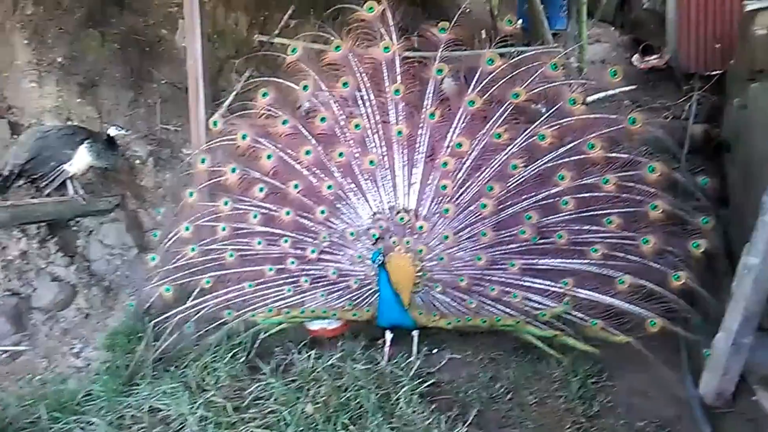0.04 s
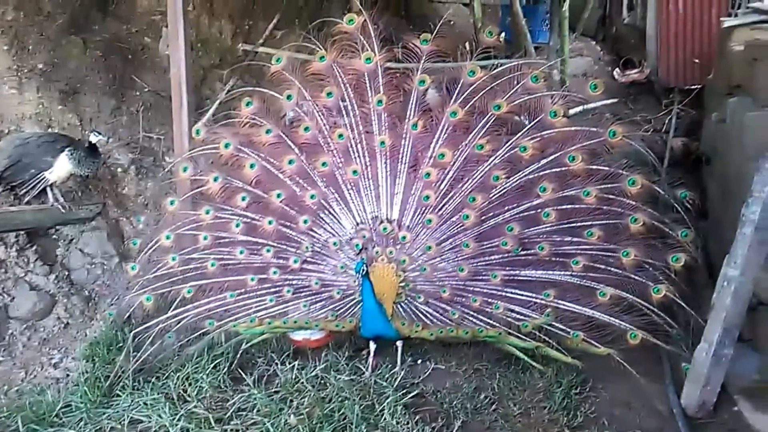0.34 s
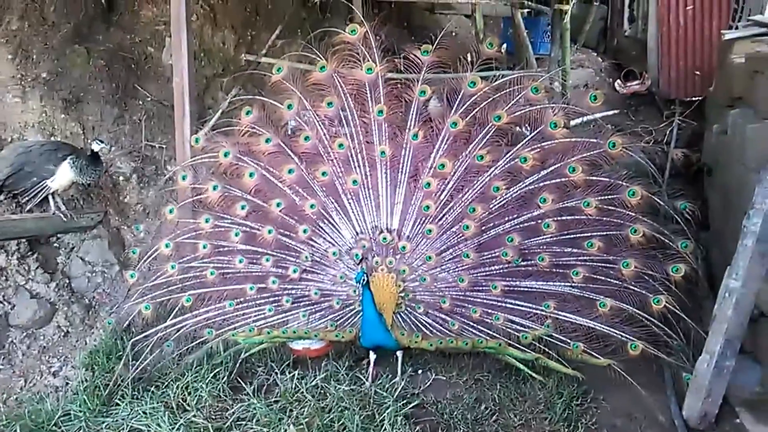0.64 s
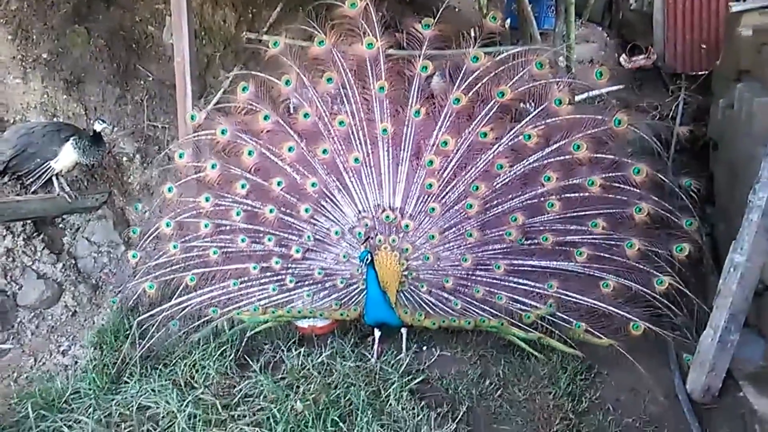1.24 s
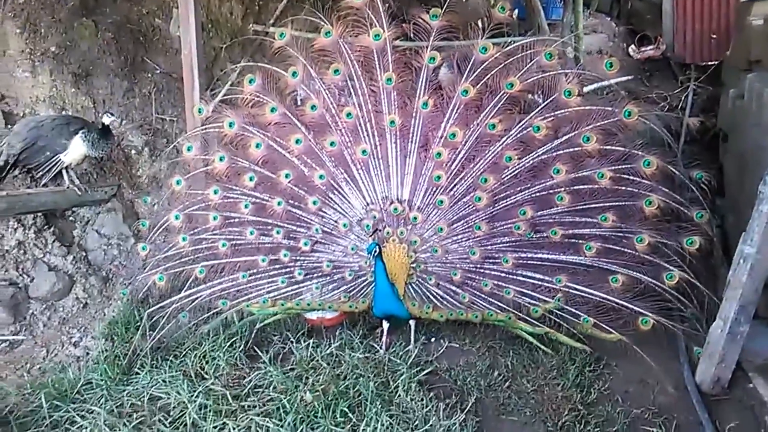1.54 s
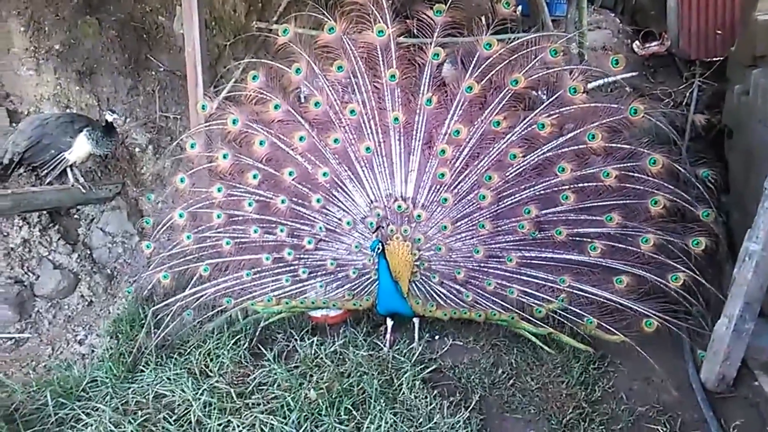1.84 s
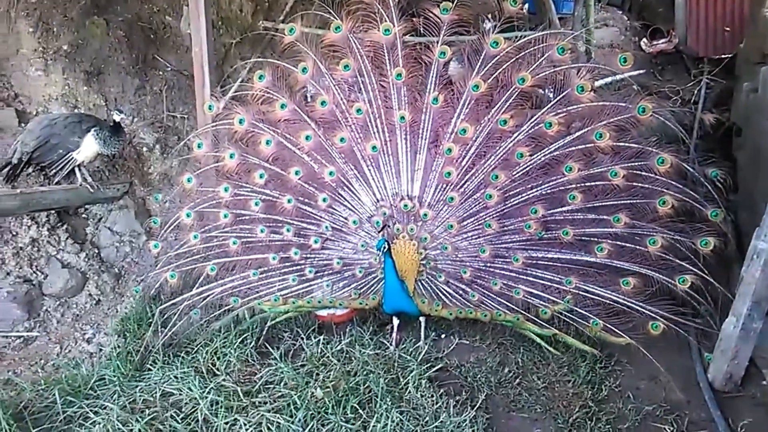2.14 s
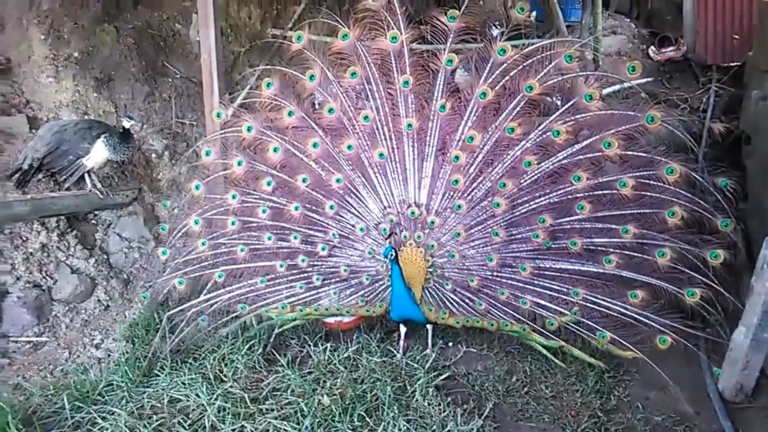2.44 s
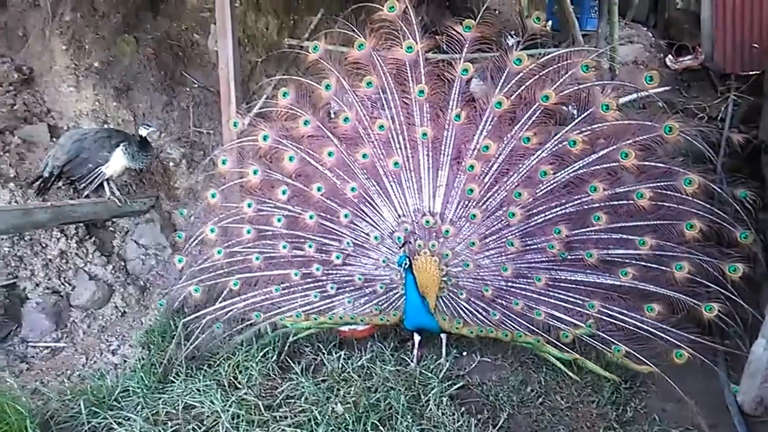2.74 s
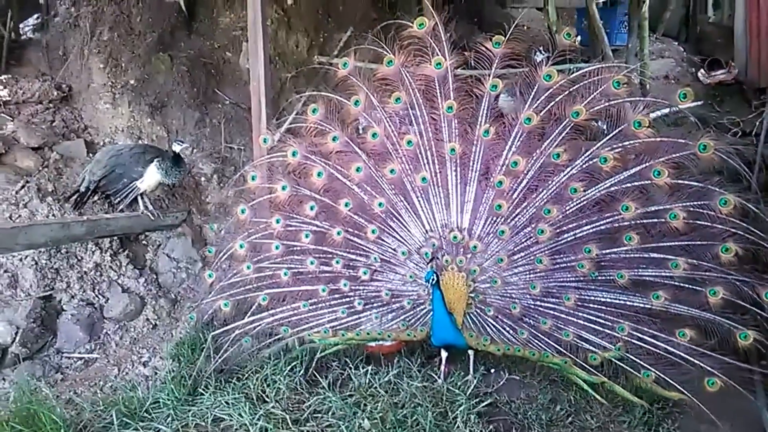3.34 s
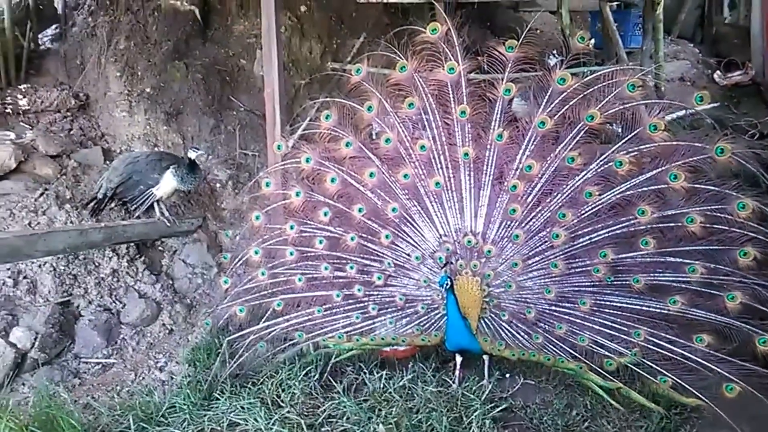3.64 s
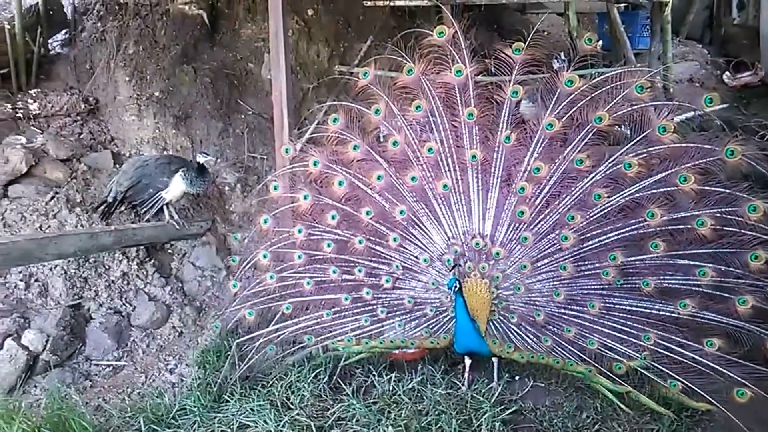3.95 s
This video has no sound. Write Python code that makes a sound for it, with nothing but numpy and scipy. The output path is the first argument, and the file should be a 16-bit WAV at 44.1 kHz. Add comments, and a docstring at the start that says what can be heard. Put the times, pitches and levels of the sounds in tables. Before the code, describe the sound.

A soft, steady wash of wind in leaves, under light handling bumps and faint chirps.

```python
"""A quiet yard, where a peacock stands silently with its train spread. A distant wash of wind and leaves
(shaped noise with faint knocks inside) carries a fine hiss whose top falls away halfway through.
Soft bumps and shuffles, probably from a hand-held microphone, ring hollowly near 270 Hz. A small bird
gives six faint chirps, falling tones that echo around the yard, and brief rustles come and go."""
import sys
import numpy as np
from scipy import signal
from scipy.fft import rfft, irfft
from scipy.io import wavfile

SR = 44100
rng = np.random.default_rng(int(sys.argv[2]) if len(sys.argv) > 2 else 0)


def unload_audio(sound):
    """Save the sound as a 16-bit wav file, at the path given as the first command line argument."""
    columns = np.transpose(np.atleast_2d(sound))
    # keep every value between -1 and 1, then stretch to whole-number steps
    steps = np.round(np.clip(columns, -1, 1) * 32767)
    wavfile.write(sys.argv[1], SR, steps.astype(np.int16))


N = 176400
T = np.arange(N) / SR
HZ = np.maximum(np.arange(N // 2 + 1) * SR / N, 1)


def from_db(db):
    """Turn decibels into a gain to multiply by."""
    return 10 ** (np.asarray(db) / 20)


def rms_one(x):
    """Scale a signal so its average power is 1."""
    return x / np.sqrt(np.mean(x ** 2) + 1e-20)


def level(rows):
    """Gain over time from rows of t/s, level/dB."""
    return from_db(np.interp(T, *np.transpose(rows)))


def over_hz(rows):
    """Join a table's rows into curves over frequency, one for each column after f/Hz."""
    hz, *columns = np.transpose(rows)
    return np.array([np.interp(np.log(HZ), np.log(hz), c) for c in columns])


def resonance(hz, width_hz):
    """A filter that favours one pitch, like an object that rings."""
    return 1 / (1 + 1j * (HZ ** 2 - hz ** 2) / (HZ * width_hz))


def drift(rate_hz):
    """A smooth random wobble, about 1 in size, mostly slower than rate_hz."""
    return rms_one(irfft(rfft(rng.standard_normal(N)) / (1 + (HZ / rate_hz) ** 2), N))


def left_leads(x):
    """Sound reaches the right ear a little later than the left."""
    # how far the right ear lags: f/Hz, phase/rad
    lag = [(60, 0), (150, 0), (290, .5), (620, 0.64), (900, 0.86), (1600, 2.5), (2900, 5.5)]
    return irfft(rfft(x) * np.exp(-1j * over_hz(lag) * np.array([[0], [1]])), N)


def noise(colour):
    """Stereo noise of a given colour, alike in both ears in the bass and unrelated in the treble."""
    # how alike the ears are: f/Hz, likeness/0-1
    likeness = [(50, 0.9), (150, 0.96), (280, 0.99), (450, 0.93), (700, 0.58), (900, 0.16), (1500, 0.51),
                (2300, 0), (5000, 0.04)]
    mid, side = rfft(rng.standard_normal((2, N)))
    alike = np.clip(over_hz(likeness), 0, 1)
    ears = np.sqrt(1 + alike) * mid + np.sqrt(1 - alike) * side * [[1], [-1]]
    return rms_one(left_leads(irfft(ears * colour, N)))


def pan(db):
    """Left and right gains that make the left louder by db."""
    return from_db(np.array([[db], [-db]]) / 2)


def swell(start_s, rise_s):
    """A soft push that peaks rise_s after it starts, then dies away."""
    age = np.maximum(T - start_s, 0) / rise_s
    return (age * np.exp(1 - np.minimum(age, 100))) ** 2


def wind(wash_db=1.23, clatter_db=-6.5, rumble_db=-53.5, wash_flicker_db=1.0, rumble_flicker_db=1.5):
    """A distant wash of wind, faint clatter and the low rumble of the air rise and fall together."""
    # strength of the wind: t/s, level/dB
    strength = [(0.0, -50.5), (0.08, -52.5), (0.61, -49.5), (0.75, -50.5), (1.27, -47.5), (2.56, -48.5),
                (2.71, -48), (4.0, -48.5)]
    # colours of the wash and the rumble: f/Hz, level/dB
    wash_colour = [(30, -46), (150, -17.5), (300, -3.5), (400, -2.5), (570, 0.5), (850, 0), (1020, -0.5),
                   (1150, -6), (1500, -4), (2000, -8.5), (2800, -9.5), (3400, -11.5), (6000, -36.5)]
    rumble_colour = [(20, -52), (33, -33), (44, -2), (75, 0), (100, -4.5), (130, -2.5), (160, -8),
                     (210, -6), (400, -21.5), (900, -41)]
    flow = level(strength)
    wash = from_db(wash_db + wash_flicker_db * drift(14)) * noise(from_db(over_hz(wash_colour)))
    rumble_gain = rms_one(flow) * from_db(rumble_db + rumble_flicker_db * drift(8.6))
    rumble = rumble_gain * noise(from_db(over_hz(rumble_colour)))
    return flow * (wash * pan(0.44) + from_db(clatter_db) * clatter()) + rumble * pan(2.5)


def clatter(knocks_per_s=45, pitches=20, low_hz=471.5, high_hz=1052, spread_db=1):
    """Small random knocks ring briefly, each pitch from its own place."""
    spectrum = 0
    for hz in np.geomspace(low_hz, high_hz, pitches):
        hits = rng.random(N) < knocks_per_s / pitches / SR
        knocks = hits * from_db(spread_db * rng.uniform(-1, 1, N))
        spectrum += rfft(knocks) * resonance(hz, width_hz=23) * pan(rng.uniform(-7, 5.6))
    return rms_one(left_leads(irfft(spectrum, N)))


def hiss(flicker_db=0.68):
    """Leaves hiss throughout; a finer, higher hiss falls away halfway through."""
    # colours of the two hisses: f/Hz, left level/dB, right level/dB
    leaf_colour = [(1200, -5, -12.5), (2400, -5.5, -8.5), (3250, -7.5, -37), (3900, -0.5, -8),
                   (4410, 2.5, -10), (5250, -8, -5.5), (5380, -9.5, -4.5), (7750, -19, -11.5),
                   (10130, -26, -19.5), (14000, -57, -30.5)]
    fine_colour = [(3500, -12.5, -48), (5670, -11, 0.5), (6040, -3.5, 1), (7460, -4, 3), (9000, -6.5, -2.5),
                   (11000, -10, -8.5), (14200, -15, -15.5)]
    # their loudness: t/s, level/dB
    leaf_level = [(0, -51), (.35, -52), (.72, -50.5), (.99, -54), (1.15, -48), (1.35, -49), (1.76, -47.5),
                  (2, -49.5), (2.3, -49), (2.62, -51), (2.74, -49.5), (3.18, -50), (3.35, -50), (3.68, -50),
                  (3.8, -51), (4, -50.5)]
    fine_level = [(0, -52), (1.2, -52), (2.02, -52.3), (2.12, -60), (2.2, -66), (2.4, -79), (2.47, -60),
                  (2.62, -58.5), (2.74, -69), (2.85, -80), (2.96, -59), (3.1, -89), (3.22, -65),
                  (3.36, -72), (3.48, -68), (3.6, -76), (4, -78)]
    leaves = level(leaf_level) * noise(from_db(over_hz(leaf_colour)))
    fine = level(fine_level) * noise(from_db(over_hz(fine_colour)))
    return (leaves + fine) * from_db(flicker_db * drift(12))


def shuffling(gain_db=1.5, flicker_db=0.5):
    """Light, uneven rubbing keeps a hollow body ringing."""
    # pitches the body rings at: f/Hz, half width/Hz, level/dB
    hollow = [(233, 22, -7.5), (269.2, 4.8, 0.5), (281, 18.7, -5), (320, 7, -12.5)]
    # strength of the rubbing: t/s, level/dB
    rubbing = [(0, -63.5), (.4, -56.5), (.8, -56), (1.0, -52.5), (1.4, -49.5), (1.63, -57.5), (1.85, -50),
               (2.12, -62.5), (2.27, -52), (2.7, -54), (2.88, -57), (3.08, -52), (3.32, -57), (3.48, -49.5),
               (4, -59)]
    body = sum(from_db(db) * np.abs(resonance(hz, 2 * half)) ** 2 for hz, half, db in hollow)
    return level(rubbing) * from_db(gain_db + flicker_db * drift(30)) * noise(body)


def bumps(ring_wobble=0.0455, thud_wobble=0.131, overtone_ratio=1.9, overtone_db=-11):
    """Each soft bump makes a short hollow ring, a dull low thud and a noisy scuff."""
    # bumps: t/s, ring f/Hz, ring level/dB, thud f/Hz, thud level/dB, scuff level/dB
    hits = [(0.173, 260, -43, 150, -52, -65), (.415, 268, -60, 46, -44, -64),
            (.468, 257, -39.5, 55.2, -50, -45.5), (0.629, 290, -37, 110, -66, -62),
            (0.846, 301.4, -38.5, 109, -58, -55), (0.885, 268, -38, 130, -57, -48.5),
            (.955, 246.6, -44.5, 113.7, -47.5, -62), (1.019, 265, -46, 131, -53, -51),
            (1.128, 290, -36, 80.7, -48, -51), (1.250, 292, -44, 55, -47, -61),
            (1.325, 266.7, -38.5, 71, -60, -57), (1.42, 265, -43, 130, -50, -55),
            (1.500, 264, -56, 60, -51, -45), (1.660, 250, -65, 80.7, -40.3, -66),
            (1.759, 272.7, -39, 120.3, -50, -49), (1.795, 270.3, -38.5, 70.5, -61, -49),
            (1.925, 259, -51, 72, -40, -41.5), (1.950, 293, -33, 70.3, -50, -56),
            (1.998, 267, -56, 72, -41, -45.5), (2.066, 266, -57, 105, -44.5, -48),
            (2.155, 265, -64, 115, -44.5, -60), (2.204, 262.3, -40.5, 69, -62, -62),
            (2.468, 266, -48, 80, -54, -53), (2.558, 262, -38.5, 85, -45.5, -42),
            (2.662, 255, -38, 72, -41, -43.5), (2.694, 245.6, -47.5, 140, -44, -55),
            (2.868, 268, -59, 131, -47, -49), (2.978, 268, -39.5, 74.6, -49, -47),
            (3.028, 265, -44, 70, -60, -46), (3.095, 289, -42, 69.5, -58, -61),
            (3.145, 263, -49, 100, -43, -60), (3.196, 303.7, -37.5, 139.4, -45, -49),
            (3.302, 270, -56, 79.6, -52, -42.5), (3.422, 270, -38, 68.6, -56, -64),
            (3.560, 273.6, -37.5, 74.7, -44.5, -54), (3.594, 290, -42, 130, -56, -54),
            (3.775, 261, -43, 58, -37, -49), (3.858, 272, -45, 80, -60, -64),
            (3.967, 268, -41, 129.8, -50.5, -48)]
    # colour of a scuff: f/Hz, level/dB
    scuff_colour = [(250, -21), (480, 4), (900, 6.5), (1400, -17), (4000, -29), (9000, -65)]
    scuff = noise(from_db(over_hz(scuff_colour)))
    # clocks that run unevenly make the pitches waver
    ring_clock = np.cumsum(1 + ring_wobble * drift(56.9)) / SR
    thud_clock = np.cumsum(1 + thud_wobble * drift(40.7)) / SR
    tones, scuffs = 0, 0
    for start, ring_hz, ring_db, thud_hz, thud_db, scuff_db in hits:
        push = swell(start, rise_s=0.012)
        tones += push * from_db(ring_db) * np.sin(2 * np.pi * ring_hz * ring_clock)
        phase = 2 * np.pi * thud_hz * thud_clock
        thud = np.sin(phase) + from_db(overtone_db) * np.sin(overtone_ratio * phase)
        tones += swell(start, rise_s=0.014) * from_db(thud_db) * thud
        scuffs += push * from_db(scuff_db) * scuff
    return left_leads(tones) + scuffs


def bird(rise_s=0.011, fade_s=0.017, bend_s=0.0032, sag_octaves_per_s=1.6, rasp_hz=240):
    """A small bird's raspy chirps sag in pitch, then drop faster, and echo off the walls and yard."""
    # chirps: middle t/s, f/Hz, extra drop/(octaves per s), level/dB, pan/dB, rasp/rad
    chirps = [(.514, 2997, 2, -49.5, -1, 0.33), (0.854, 2897, 8, -45, 3, .45),
              (1.236, 2887, 17, -43, 3.5, .65), (1.650, 2957, 12, -43.5, 5, 0.58),
              (2.295, 2973, 1.55, -49.5, 2, 0.77), (2.770, 2970, 4.5, -45.5, 1, 0.88)]
    roughness = drift(rasp_hz)
    calls = np.zeros((2, N))
    for middle, hz, drop, db, pan_db, rasp in chirps:
        near = np.abs(T - middle) < 0.15
        age = T[near] - middle
        drop_time = bend_s * np.logaddexp(0, age / bend_s)  # starts counting around the middle
        octaves_down = sag_octaves_per_s * age + drop * drop_time
        phase = 2 * np.pi * np.cumsum(hz * 2 ** -octaves_down) / SR
        loudness = from_db(db) * 2 / (np.exp(-age / rise_s) + np.exp(age / fade_s))
        calls[:, near] += pan(pan_db) * loudness * np.sin(phase + rasp * roughness[near])
    walls = from_db(-0.5) * echoes(calls, decay_s=0.18, width_hz=2500)
    yard = from_db(1.5) * echoes(calls, decay_s=1, width_hz=450)
    return left_leads(calls) + walls + yard


def echoes(x, decay_s, width_hz, centre_hz=2980):
    """Many reflections blur into a tail, different in each ear, that fades 60 dB in decay_s."""
    tail = rfft(rng.standard_normal((2, N)) * from_db(-60 * T / decay_s))
    return irfft(rfft(x) * tail / np.std(tail) * resonance(centre_hz, width_hz), N)


def rustles():
    """Brief, soft swishes of noise, each gathered around one pitch."""
    # swishes: middle t/s, f/Hz, half length/s, level/dB, width/share of the pitch
    swishes = [(1.443, 1720, .012, -54, .1), (1.737, 1240, 0.022, -47.5, 0.13),
               (2.246, 1010, 0.02, -45.5, 0.082), (2.45, 4230, 0.018, -51, 0.28),
               (2.644, 585, 0.049, -47, 0.092), (2.735, 4320, .03, -53, .15),
               (3.187, 974, 0.021, -44, 0.034), (3.497, 3320, 0.053, -51.5, .4),
               (3.598, 470, 0.027, -48, 0.13), (3.698, 1007, .022, -51, 0.044)]
    sound = 0
    for middle, hz, half_length, db, width in swishes:
        loudness = from_db(db) * np.exp(-((T - middle) / half_length) ** 2)
        sound += loudness * noise(resonance(hz, width * hz) ** 2)
    return sound


def scene():
    """Everything in the yard, added together."""
    return wind() + hiss() + shuffling() + bumps() + bird() + rustles()


def record(dry, low_cut_hz=30, high_cut_hz=14100):
    """The microphone loses the deepest bass, and the highest treble is cut steeply."""
    thinned = irfft(rfft(dry) / np.sqrt(1 + (low_cut_hz / HZ) ** 10), N)
    treble_cut = signal.ellip(12, 0.1, 80, high_cut_hz, fs=SR, output="sos")
    return signal.sosfilt(treble_cut, thinned)


dry = scene()
out = record(dry)
unload_audio(out)
```